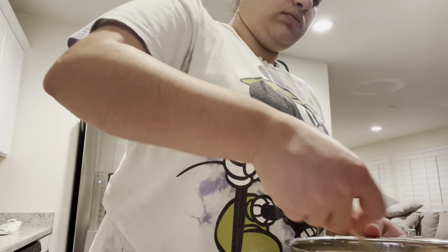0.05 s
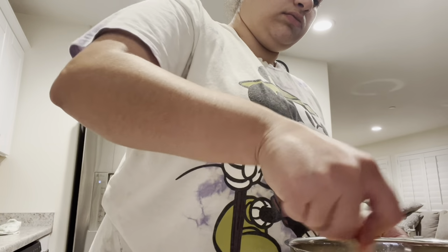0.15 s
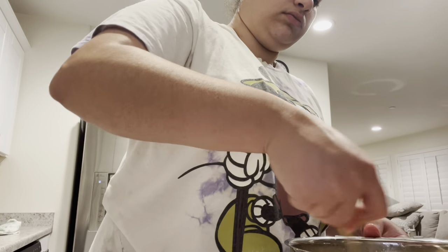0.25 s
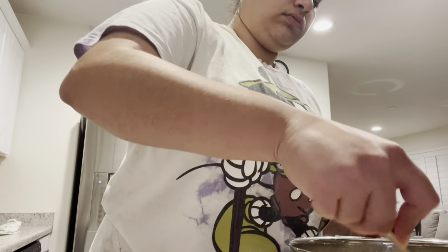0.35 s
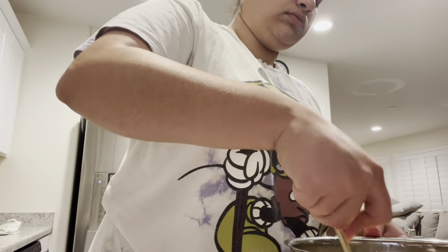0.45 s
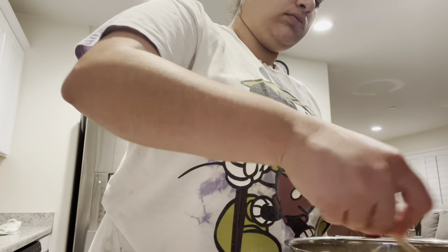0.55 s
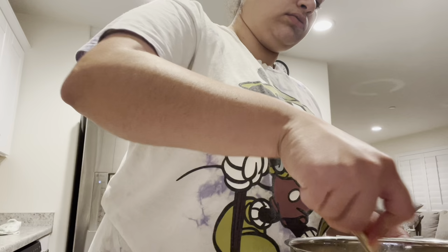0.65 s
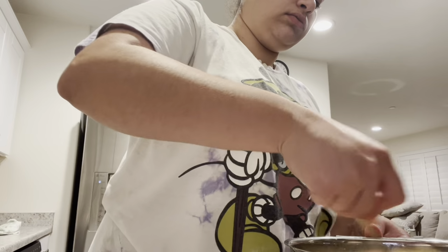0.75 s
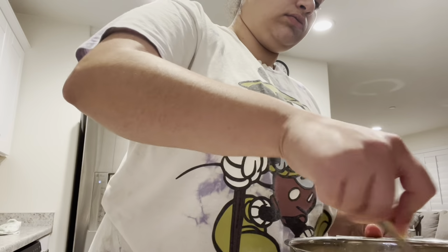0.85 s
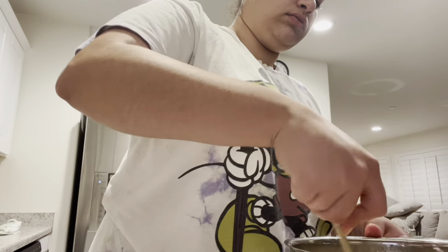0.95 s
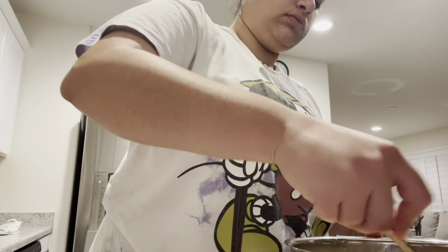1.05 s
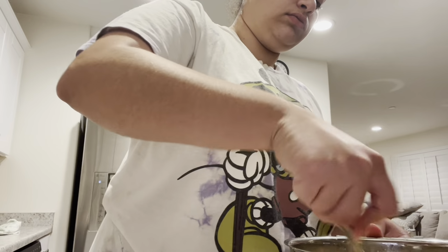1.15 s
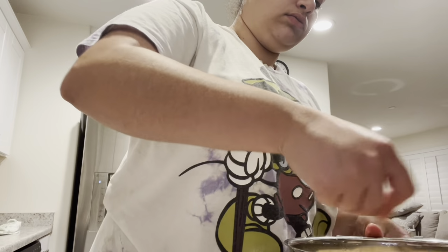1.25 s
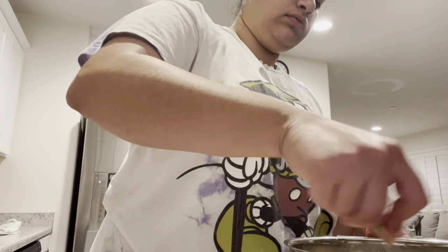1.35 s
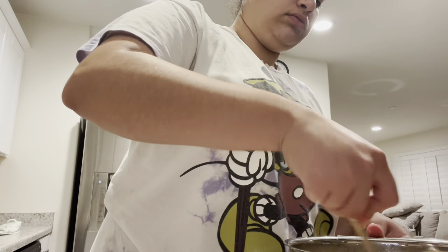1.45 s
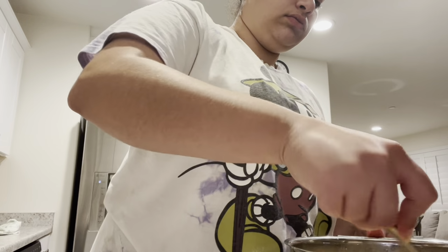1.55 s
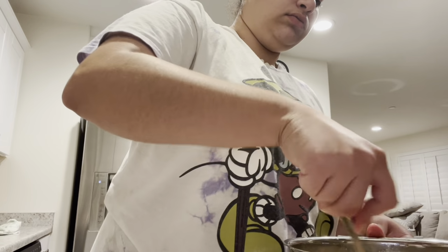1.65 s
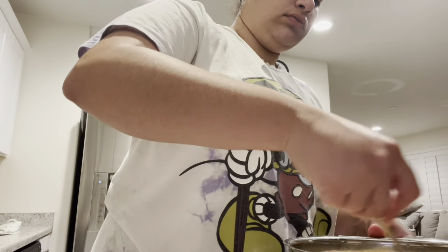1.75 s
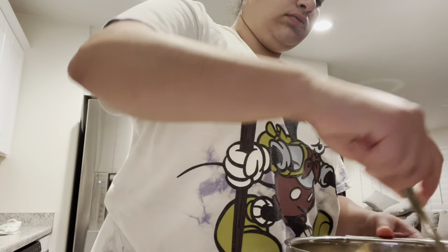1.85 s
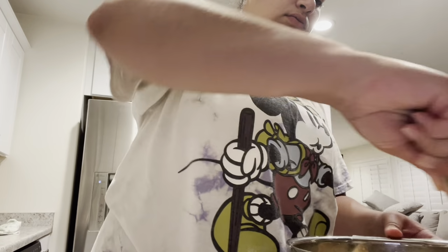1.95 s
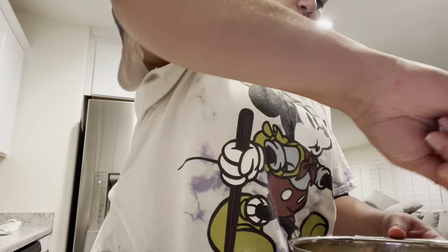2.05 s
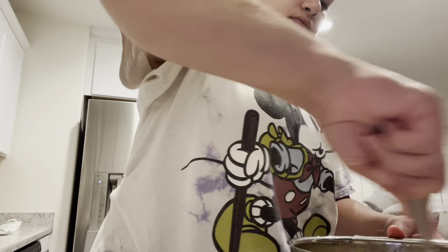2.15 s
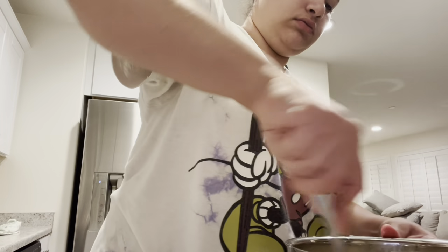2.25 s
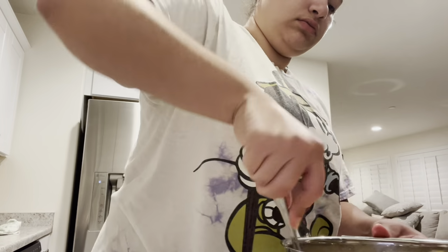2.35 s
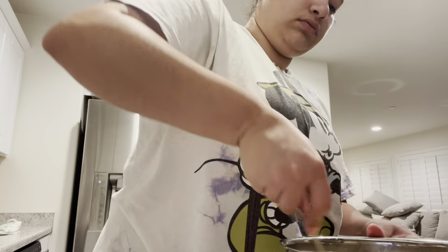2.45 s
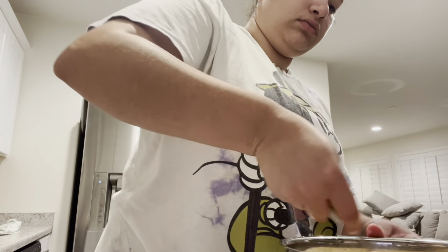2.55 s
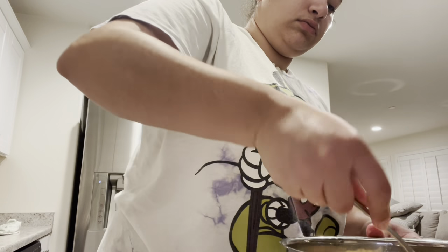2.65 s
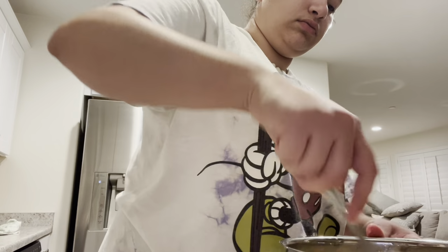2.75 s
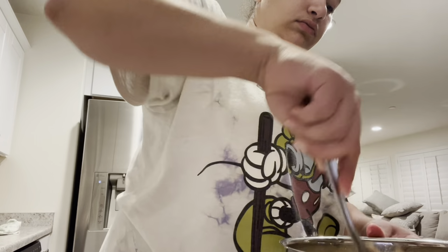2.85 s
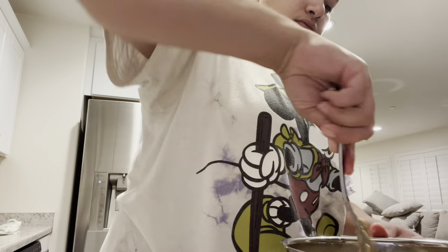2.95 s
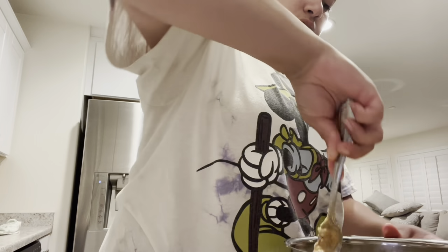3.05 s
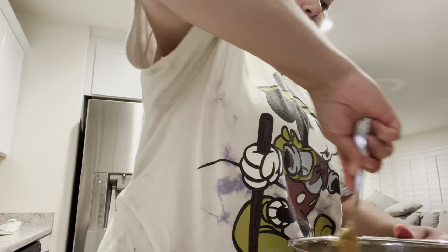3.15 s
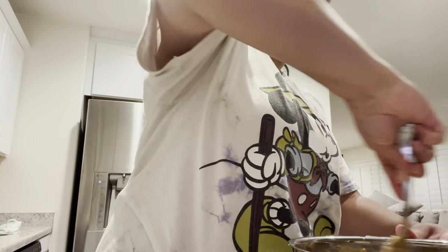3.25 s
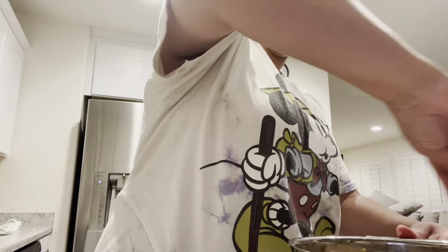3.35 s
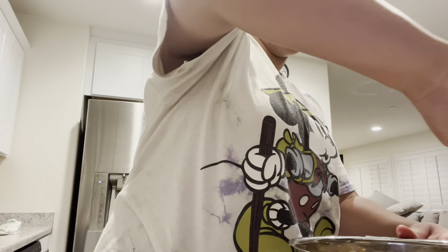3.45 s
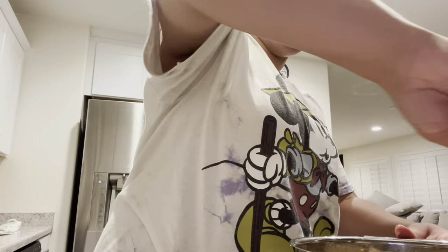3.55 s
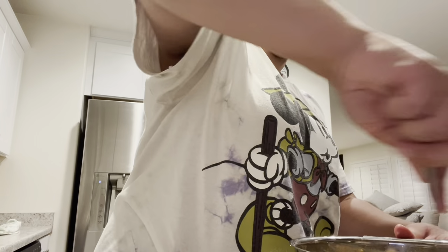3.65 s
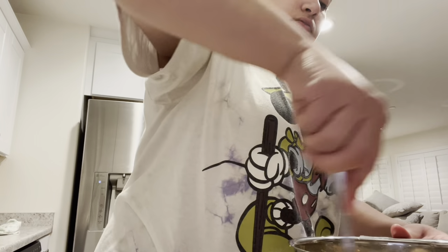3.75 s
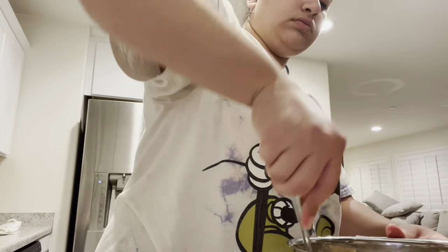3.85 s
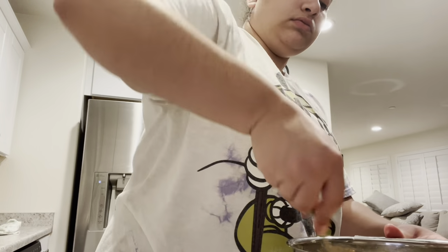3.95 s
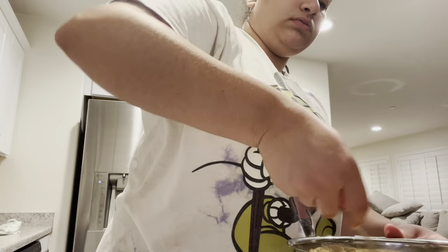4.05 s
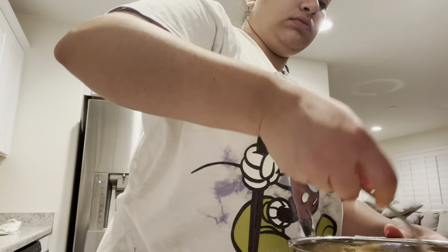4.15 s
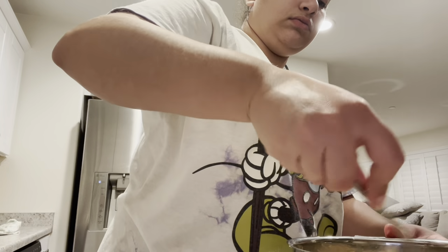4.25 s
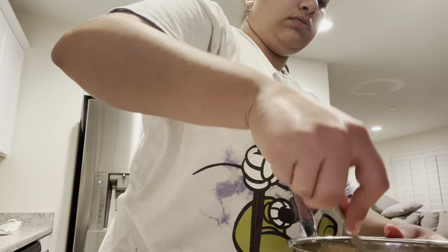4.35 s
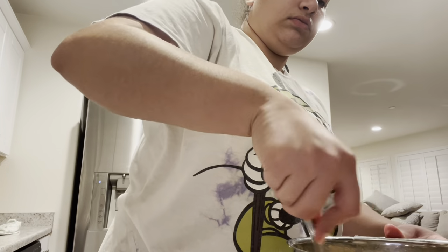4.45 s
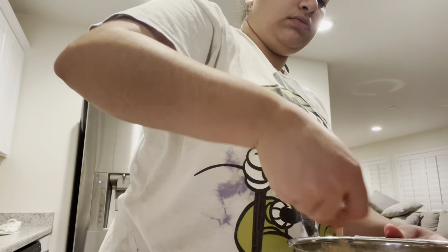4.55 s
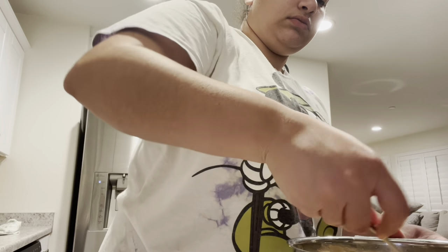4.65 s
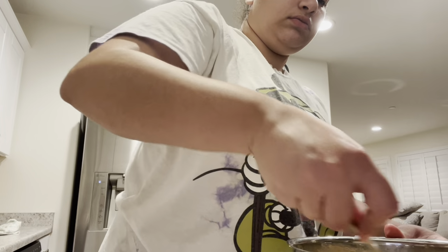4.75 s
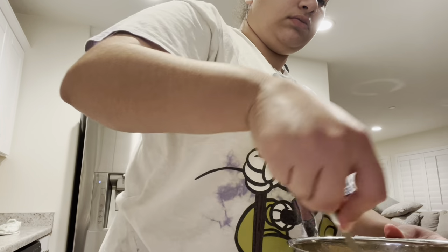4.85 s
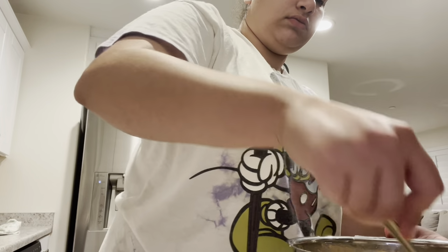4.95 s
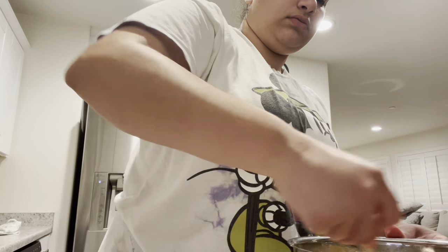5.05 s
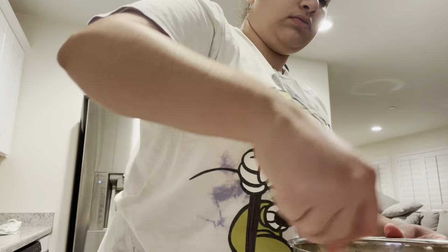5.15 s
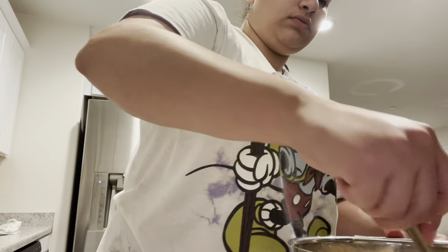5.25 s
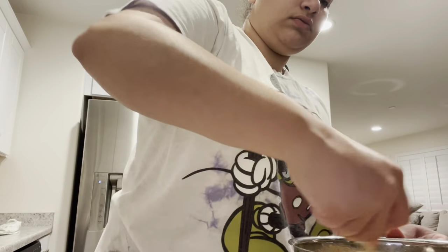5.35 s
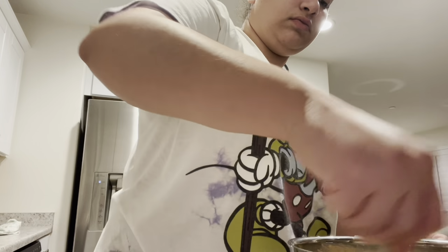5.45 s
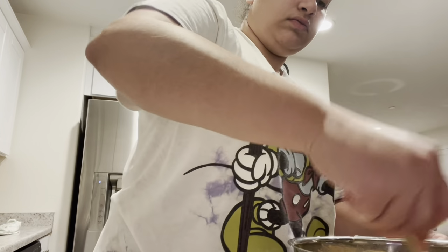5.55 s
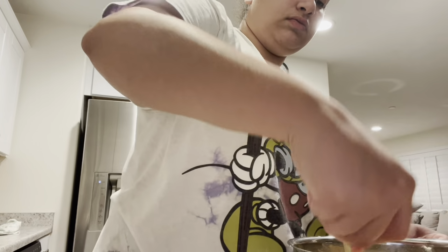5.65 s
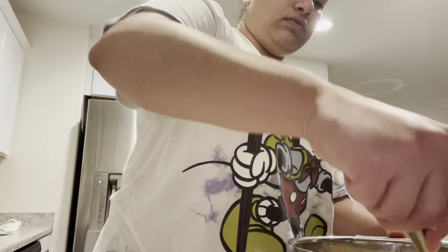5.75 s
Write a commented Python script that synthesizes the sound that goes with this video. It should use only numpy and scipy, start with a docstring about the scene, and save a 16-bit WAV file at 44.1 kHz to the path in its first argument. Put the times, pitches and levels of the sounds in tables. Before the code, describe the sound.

In a quiet home kitchen, a metal utensil pushes thick batter around a steel bowl, about four heavy low thumps a second with light clicks and wet squelches between. After nearly two seconds it pauses for gritty scrapes and a few bright clinks on the rim, then vigorous stirring returns. Close stereo microphone, short room reflections, faint low room tone.

```python
"""A metal utensil works thick batter in a steel bowl held on a kitchen counter, close to the microphone.
From the start, over a faint room tone, sliding makes noise from dense fine slips; taps and pushes click
on the wall (short noise and fading tones), rock the bowl (low decaying modes) and squelch (wet crackle).
Midway the stirring pauses for soft scraping, a few taps and brighter clinks (ringing metal modes).
Then the pushing resumes. Random reflections add the room around it all."""
import sys
import numpy as np
from scipy import signal
from scipy.fft import rfft, irfft, next_fast_len
from scipy.io import wavfile

SR = 44100
rng = np.random.default_rng(int(sys.argv[2]) if len(sys.argv) > 2 else 0)


def dump(signal):
    """Clip the signal to [-1, 1] and save it as 16-bit WAV at the path in sys.argv[1]."""
    limited = np.clip(np.atleast_2d(signal).T, -1, 1)
    pcm = np.round(limited * 32767).astype(np.int16)
    wavfile.write(sys.argv[1], SR, pcm)


N = 255339
TIME = np.arange(N) / SR
FREQS = np.maximum(np.fft.rfftfreq(N, 1 / SR), 1)

# Event levels are starting points: the functions below add their own gains. Colours give only balance.
# the quiet kitchen: (frequency [Hz], relative level per Hz [dB])
ROOM_TONE = [(25, -10), (60, 3), (130, 5), (240, -8.5), (340, -5.5), (450, -10), (600, -27), (820, -9.5),
             (1150, -27.5), (2000, -40.5), (5000, -47.5), (8700, -51.5), (11000, -61.5), (16000, -76.5)]
ROOM_TONE_DB = -55   # before the microphone
# the edge slides along the wall: (start [s], length [s], swell [s], rasp level [dB], hiss level [dB])
SLIDES = [(0, 1.96, 0.11, -63.5, -75.5), (2.035, 0.27, 0.037, -53.5, -57),
          (2.32, 0.15, 0.012, -50.5, -54.5), (2.926, 0.45, 0.11, -64, -75), (3.341, 0.27, .018, -51.5, -56),
          (3.679, .32, 0.021, -54, -59.5), (4.248, 0.0233, 0.02, -66, -73),
          (4.468, 0.084, 0.025, -54.5, -52), (4.959, 0.041, 0.017, -61, -54),
          (5.092, .64, 0.24, -60.5, -65.5)]
SLIDE_T60_S = 0.22   # time to fall by 60 dB after a slide
RESTING_DB = -83   # the utensil barely creeping between slides
# colour of the low, rough part of sliding: (frequency [Hz], relative level per Hz [dB])
RASP_COLOUR = [(150, 4), (420, 3.5), (620, -5.5), (1200, 3), (2000, -7), (3200, -5), (4300, -29),
               (6000, -18.5)]
# colour of the high part of sliding: (frequency [Hz], relative level per Hz [dB])
HISS_COLOUR = [(2000, -25), (3200, -35), (4700, -6), (6000, 2.5), (7500, 3.5), (9500, 6), (10700, -3),
               (14000, -4), (16500, -49.5)]
# ringing of the metal: (frequency [Hz], relative level [dB], time to fall 60 dB [s])
METAL_MODES = [(1173, -13, 0.14), (1234, 0, 0.058), (1504, -32, 0.055), (1687, -7, 0.061), (1853, -19, .05),
               (2062, 1, .07), (2265, -8.5, 0.058), (2582, -8, 0.11), (2920, -1.5, 0.035),
               (3290, -2, 0.018), (3545, -14.5, 0.14), (3580, -9, 0.065), (3870, -10, 0.11),
               (4128, -4.5, 0.066), (4460, -9.5, 0.22), (4890, -9, 0.082), (5330, -11.5, .06),
               (6180, -7.5, 0.048)]
# between pushes the edge taps the coated wall:
# (time [s], tick level [dB], thump level [dB], clack pitch [Hz])
TAPS = [(0.002, -44.5, -34.5, 790), (0.1585, -31.5, -30.5, 1334), (0.3586, -39.5, -37.5, 1030),
        (0.393, -29.5, -29.5, 2060), (0.5668, -35, -29.5, 1044), (0.6343, -33.5, -27.5, 1990),
        (0.731, -35.5, -40, 840), (0.84, -40.5, -39.5, 1160), (0.902, -36, -33, 1020),
        (1.0673, -34, -31, 1000), (1.116, -31.5, -28, 1950), (1.2792, -34.5, -29.5, 960),
        (1.37, -33, -30.5, 1330), (1.529, -46, -31.5, 840), (1.6042, -35.5, -30, 1235),
        (2.0378, -43.5, -42.5, 2120), (2.326, -48, -38.5, 3030), (3.855, -53, -37, 1670),
        (4.4738, -46, -40.5, 1260), (4.9527, -39, -34.5, 5140), (5.2172, -36, -32, 2040),
        (5.247, -37.5, -29, 1370), (5.4712, -30.5, -27, 2110), (5.5006, -31, -31.5, 1250),
        (5.73, -38.5, -36.5, 1690), (5.7534, -31.5, -34, 1440)]
TAP_CLACK_DB = -6.5   # relative to the tick
TAP_KNOCK_DB, TAP_SQUELCH_DB = -19.5, -17.5   # relative to the thump
TAP_POCKET_HZ = 1217   # air pocket pitch, also used for rim hits
# the loaded bowl rocking on the counter: (frequency [Hz], relative level [dB], time to fall 60 dB [s])
THUMP_MODES = [(68.9, -7, 0.64), (109.1, -0.5, 0.27), (152.35, 2, .17), (174, -13, 0.19), (221.1, -5, .15),
               (238.9, -3.5, .13)]
# the damped bowl wall: (frequency [Hz], relative level [dB], time to fall 60 dB [s])
KNOCK_MODES = [(281, -2.5, 0.03), (328, -15.5, 0.046), (382, -2, 0.081), (423.1, 0, 0.16), (442, -6, 0.13),
               (503, -15, 0.072), (649, -19.5, 0.067), (670, -18, 0.069), (768, -13.5, 0.061),
               (814, -13.5, 0.12), (993, -5.5, 0.063)]
# pitch the held bowl favours under a light tap; harder blows raise it: (time [s], pitch [Hz])
ROCKING = [(0, 142), (1.35, 176), (2.2, 155), (3.5, 121), (5.0, 143), (5.79, 139)]
LIGHT_TAP_DB, ROCKING_OCTAVES_PER_DB = -29, .018
# colour of the click: (frequency [Hz], relative level per Hz [dB])
TICK_COLOUR = [(1200, 0.5), (2800, -25), (4500, 2.5), (6000, 1.5), (9000, 1), (11000, 10.5), (14000, 2),
               (16500, -36.5)]
# colour of the wet crackle: (frequency [Hz], relative level per Hz [dB])
SQUELCH_COLOUR = [(400, -9.5), (750, 14.5), (1300, -11.5), (2000, 3), (3100, -2), (4500, -1), (6000, -2),
                  (9000, 0.5), (11000, 1.5), (14000, -2), (16500, -28)]
# once per turn the utensil shoves the batter against the wall:
# (time [s], thump level [dB], clack pitch [Hz], air pocket pitch [Hz])
PUSHES = [(0.212, -24.5, 1120, 3400), (0.45, -22, 1230, 997), (0.7013, -18, 3290, 2600),
          (0.9446, -25, 1190, 3180), (1.182, -20, 1094, 2420), (1.4494, -17, 990, 1040),
          (1.679, -18.5, 752, 2670), (5.066, -17, 5420, 1300), (5.36, -13.5, 3630, 3900),
          (5.609, -21.5, 1185, 1240)]
# what a push gives: (level at usual strength [dB], gain per dB of extra thump [dB/dB])
USUAL_PUSH_DB = -18.5
PUSH_TICK, PUSH_CLACK, PUSH_KNOCK, PUSH_SQUELCH = (-31.5, 0.63), (-36.5, .95), (-37.5, 2.4), (-42.5, 0.92)
# brief faint touches and wet catches, played as short rings:
# (time [s], level [dB], most favoured pitch [Hz])
SHORT_RINGS = [(1.293, -37, 3250), (1.9062, -45, 4500), (4.184, -66, 2000), (4.575, -54, 2590),
               (4.6664, -61.5, 3000), (5.528, -44, 2830)]
# in the pause it strikes the bare rim:
# (time [s], clack level [dB], clack pitch [Hz], ring level [dB], ring pitch [Hz], thump level [dB])
RIM_HITS = [(2.2428, -28, 900, -28.5, 1490, -32.5), (3.2632, -38.5, 2140, -31, 2106, -39),
            (3.6434, -37.5, 1400, -24.5, 2580, -61), (3.719, -49.5, 1680, -34.5, 1700, -30.5)]
RIM_TICK_DB = -10   # relative to the ring
RIM_KNOCK_DB = -16   # relative to the weaker of clack and thump
RIM_SQUELCH_DB = -20.5   # relative to the thump
# left minus right: (frequency [Hz], level difference [dB])
BALANCE = [(100, 2), (250, 0), (450, -2), (1000, -3), (2000, -10.5), (4000, -5.5), (8000, 0), (16000, 0)]
# how far the left side leads: (frequency [Hz], phase [radians])
LEAD = [(40, 2.5), (100, .9), (160, 1.35), (230, 1.84), (420, 1.42), (1300, -0.5), (1800, 1.2), (3800, -4),
        (6500, 1.54), (8000, 1.4), (11500, -4), (15500, -2)]
# colour of the reverberation: (frequency [Hz], relative level per Hz [dB])
ROOM_COLOUR = [(60, -3.5), (150, 1), (400, 2), (1000, 0), (4000, -4), (10000, -3.5), (16000, -18.5)]
CUTOFF_HZ = 16300


def from_db(db):
    """Turn decibels into gain."""
    return 10 ** (np.asarray(db) / 20)


def rms_one(x):
    """Scale to an average power of one."""
    return x / np.sqrt(np.mean(x ** 2) + 1e-20)


def at_hz(points, hz):
    """Read a table between its points, on a log-frequency axis."""
    f, value = np.transpose(points)
    return np.interp(np.log(hz), np.log(f), value)


def fade(t, t60):
    """Exponential decay from t = 0, falling 60 dB in t60 seconds."""
    return np.exp(-np.log(1000) * np.clip(t / t60, 0, 10)) * (t >= 0)


def add(out, s, sound):
    """Mix a sound in at time s."""
    i = max(int(s * SR), 0)
    out[..., i:i + sound.shape[-1]] += sound[..., :max(N - i, 0)]


def colour(x, spectrum):
    """Filter to a spectrum without sounding ahead of time (minimum phase), then set power to one."""
    size = next_fast_len(N + SR // 10) // 2 * 2
    hz = np.maximum(np.fft.rfftfreq(size, 1 / SR), 1)
    cepstrum = irfft(np.log(from_db(at_hz(spectrum, hz))))
    # folding the cepstrum forward makes the filter act only after its input
    cepstrum[1:size // 2] *= 2
    cepstrum[size // 2 + 1:] = 0
    response = np.exp(rfft(cepstrum))
    return rms_one(irfft(rfft(x, size) * response)[..., :N])


def stereo_noise(alike):
    """White noise that the two sides partly share."""
    alike = np.clip(alike, 0, 1)
    shared = np.sqrt(alike) * rng.standard_normal(N)
    return shared + np.sqrt(1 - alike) * rng.standard_normal((2, N))


def grains(per_s, spread_db, smooth, alike=0.45):
    """Tiny pops of uneven size over a smooth hiss."""
    sizes = from_db(spread_db * np.minimum(rng.exponential(1, N), 4))
    pops = sizes * (rng.random(N) < per_s / SR)
    return rms_one(pops * stereo_noise(alike)) + smooth * stereo_noise(alike)


def drift(per_s):
    """Smooth random wandering with a spread of one."""
    slow = np.exp(-(FREQS / per_s) ** 2)
    return rms_one(irfft(rfft(rng.standard_normal(N)) * slow, N))


def wall_echo(x, gap_s, wander, per_s, strength):
    """The bowl wall mirrors the moving blade: the changing path sweeps a comb through the sound."""
    wandering = drift(per_s) + 0.456 * np.array([drift(per_s), drift(per_s)])
    lags = gap_s * np.exp(wander * wandering)
    echo = np.array([np.interp(TIME - lag, TIME, side) for side, lag in zip(x, lags)])
    return rms_one(x + strength * echo)


def band_noise(centre_hz, width, length):
    """Stereo noise around one pitch, with power one; width is in natural-log units to each side."""
    band = signal.butter(2, centre_hz * np.exp([-width, width]), "band", fs=SR, output="sos")
    settled = signal.sosfilt(band, rng.standard_normal((2, length + SR // 20)))[:, -length:]
    return rms_one(settled)


def contacts(*names):
    """The named properties (s, Hz, levels in dB) of all pushes, taps and rim hits."""
    events = [push(*row) for row in PUSHES]
    events += [tap(*row) for row in TAPS]
    events += [rim_hit(*row) for row in RIM_HITS]
    return [np.array([event[name] for event in events]) for name in names]


def bursts(levels_db, t60, rise_s):
    """A loudness curve that jumps at each contact and dies away."""
    out, t = np.zeros(N), TIME[:SR // 2]
    for s, db in zip(*contacts("s"), levels_db):
        add(out, s, from_db(db) * fade(t, t60) * (1 - np.exp(-t / rise_s)))
    return out


def quiet_kitchen():
    """Steady coloured noise, mostly different on the two sides, makes the room tone."""
    return from_db(ROOM_TONE_DB) * colour(stereo_noise(0.13), ROOM_TONE)


def sliding():
    """Gains of rasp and hiss: each slide swells, stays level and dies away."""
    power = np.full((2, N), from_db(RESTING_DB) ** 2)
    for start, length, swell_s, rasp_db, hiss_db in SLIDES:
        t = TIME[:int((length + SLIDE_T60_S) * SR)]
        shape = np.minimum(t / swell_s, 1) * fade(np.maximum(t - length, 0), SLIDE_T60_S)
        add(power, start, (from_db([[rasp_db], [hiss_db]]) * shape) ** 2)
    return np.sqrt(power)


def metal_ring(centre_hz, scatter_db=2.0):
    """A short ring of the metal's modes, with those near one pitch favoured."""
    hz, db, t60 = np.transpose(METAL_MODES)[:, :, None]
    db = db - 7 * np.abs(np.log2(hz / centre_hz)) + scatter_db * rng.standard_normal(hz.shape)
    t, phase = TIME[:SR // 4], rng.random((2, len(METAL_MODES), 1))
    swings = np.sin(2 * np.pi * (hz * t + phase))
    return (from_db(db) * fade(t, t60) * swings).sum(1)


def scraping(ring_db, grit_db, patchy_db, catch_db, stutter_db):
    """Dense fine slips under the sliding edge, which also keep the metal faintly ringing."""
    rasp_gain, hiss_gain = sliding()
    slips = grains(per_s=740, spread_db=4.0, smooth=1.0, alike=0.19)
    ringing = rms_one(signal.fftconvolve(slips, metal_ring(centre_hz=2740), axes=1)[:, :N])
    # as the edge travels, each resonance of the metal swells and fades by itself
    grit = rms_one(sum(band_noise(hz, width=.02, length=N) * from_db(patchy_db * drift(20))
                       for hz, db, t60 in METAL_MODES))
    # now and then a coarser grain catches under the edge
    catches = colour(grains(per_s=39, spread_db=-0.5, smooth=0, alike=0.45), SQUELCH_COLOUR)
    rasp = colour(slips, RASP_COLOUR) + from_db(ring_db) * ringing
    rasp = rms_one(rasp + from_db(grit_db) * grit + from_db(catch_db) * catches)
    hiss = colour(grains(per_s=1300, spread_db=1, smooth=2.3), HISS_COLOUR)
    hiss = wall_echo(hiss, gap_s=0.000803, wander=0.21, per_s=2.7, strength=0.62)
    grip = from_db(stutter_db * drift(17))  # the edge catches and lets go
    return grip * (rasp * rasp_gain + hiss * hiss_gain)


def tap(s, tick_db, thump_db, clack_hz):
    """The clack follows the sharpness of the tap; knock and squelch follow the weight behind it."""
    return dict(s=s, tick=tick_db, clack=tick_db + TAP_CLACK_DB, clack_hz=clack_hz, thump=thump_db,
                knock=thump_db + TAP_KNOCK_DB, squelch=thump_db + TAP_SQUELCH_DB, pocket_hz=TAP_POCKET_HZ)


def clicks(blow_db, snap_db, tick_gain_db, clack_gain_db, note_db, note_width, note_t60):
    """The edge snaps onto the wall and chatters briefly, with a dead note set by where it lands."""
    s, tick_db, clack_db, pitch_hz = contacts("s", "tick", "clack", "clack_hz")
    chatter = colour(grains(per_s=3500, spread_db=0.5, smooth=0.31, alike=0.95), TICK_COLOUR)
    chatter = wall_echo(chatter, gap_s=0.000509, wander=.4, per_s=4.18, strength=0.34)
    out = chatter * bursts(tick_db + tick_gain_db, t60=0.038, rise_s=0.00088)
    t = TIME[:SR // 8]
    bright = signal.butter(2, 7500, "high", fs=SR, output="sos")
    for at, tick, db, hz in zip(s, tick_db, clack_db, pitch_hz):
        snap = signal.sosfilt(bright, rng.standard_normal(len(t)) * fade(t, t60=0.0018))
        add(out, at + 0.0011, from_db(tick + snap_db) * snap)
        # the blow itself: a few solid cycles of the wall
        blow = np.sin(2 * np.pi * hz * t) * fade(t, t60=0.02) * (1 - np.exp(-t / 0.00076))
        add(out, at + 0.00102, from_db(db + blow_db) * blow)
        clack = band_noise(np.clip(hz, 1150, 2200), width=0.87, length=len(t)) * fade(t, t60=0.053)
        note = band_noise(hz, note_width, len(t)) * fade(t, note_t60)
        mix = from_db(clack_gain_db) * clack + from_db(note_db) * note
        add(out, at, from_db(db) * mix * (1 - np.exp(-t / 0.0016)))
    return out


def bowl_ring(modes, levels_db, centres_hz, travel_s, rise_s, punch, punch_t60,
              scatter_db, detune, focus_db):
    """Each contact pushes the bowl's modes; bending waves are slower at low pitch, so lows arrive late."""
    hz, mode_db, t60 = np.transpose(modes)[:, :, None]
    out = np.zeros(N)
    t = np.maximum(TIME[:SR // 3] - travel_s * (hz[0] / hz) ** .5, 0)
    # a first swing that the batter soon swallows, together with a longer ring
    decay = fade(t, t60) + punch * fade(t, punch_t60)
    shape = from_db(mode_db) * decay * (1 - np.exp(-(t / rise_s) ** 2))
    for s, db, centre_hz in zip(*contacts("s"), levels_db, centres_hz):
        strength, shift = rng.standard_normal((2, len(modes), 1))
        # the place of contact favours some modes; the moving batter detunes them
        weight = from_db(scatter_db * strength - focus_db * np.log2(hz / centre_hz) ** 2)
        swing = (shape * weight * np.sin(2 * np.pi * hz * (1 + detune * shift) * t)).sum(0)
        # the level is set over the first 40 ms
        add(out, s, from_db(db) * swing / np.std(swing[:SR // 25]))
    return out


def rocking_and_knocking():
    """The low thump of the rocking bowl and the higher knock of its wall; harder blows favour higher modes."""
    s, knock_db, thump_db = contacts("s", "knock", "thump")
    light_tap_hz = np.interp(s, *np.transpose(ROCKING))
    thump_hz = light_tap_hz * 2 ** (ROCKING_OCTAVES_PER_DB * (thump_db - LIGHT_TAP_DB))
    thump = bowl_ring(THUMP_MODES, thump_db - 3.5, thump_hz, travel_s=0.00796, rise_s=0.0034,
                      punch=0.86, punch_t60=0.089, scatter_db=4.0, detune=0.029, focus_db=14.5)
    knock = bowl_ring(KNOCK_MODES, knock_db, 2.03 * thump_hz, travel_s=0.00402, rise_s=0.0077,
                      punch=2.6, punch_t60=0.043, scatter_db=4.5, detune=0.015, focus_db=7.5)
    return thump + knock


def squelch(gain_db, pocket_db, pocket_width, t60):
    """Batter tears from the wall behind each stroke: a wet crackle, coloured by the opening air pocket."""
    s, squelch_db, pocket_hz = contacts("s", "squelch", "pocket_hz")
    crackle = colour(grains(per_s=600, spread_db=-1.5, smooth=0.92), SQUELCH_COLOUR)
    crackle = wall_echo(crackle, gap_s=0.000578, wander=0.386, per_s=8.3, strength=0.8)
    out = crackle * bursts(squelch_db + gain_db, t60, rise_s=0.013)
    t = TIME[:SR // 4]
    for at, db, hz in zip(s, squelch_db, pocket_hz):
        pocket = band_noise(hz, pocket_width, len(t)) * fade(t, t60) * (1 - np.exp(-t / 0.0035))
        add(out, at, from_db(db + pocket_db) * pocket)
    return out


def push(s, db, clack_hz, pocket_hz):
    """One strength drives the whole push; the wall's knock grows fastest with it."""
    tick, clack, knock, wet = (level + growth * (db - USUAL_PUSH_DB) for level, growth in
                               (PUSH_TICK, PUSH_CLACK, PUSH_KNOCK, PUSH_SQUELCH))
    return dict(s=s, tick=tick, clack=clack, clack_hz=clack_hz, thump=db,
                knock=knock, squelch=wet, pocket_hz=pocket_hz)


def short_rings(gain_db):
    """Brief faint touches, wet catches and rim hits, all played as short rings of the metal's modes."""
    rings = list(SHORT_RINGS)
    rings += [(s, ring_db, ring_hz) for s, _, _, ring_db, ring_hz, _ in RIM_HITS]
    out = np.zeros((2, N))
    for s, db, centre_hz in rings:
        add(out, s, from_db(db + gain_db) * metal_ring(centre_hz))
    return out


def rim_hit(s, clack_db, clack_hz, ring_db, ring_hz, thump_db):
    """A hit on the bare rim is mostly clack and ring; the wall knocks only if it is both hard and heavy."""
    return dict(s=s, tick=ring_db + RIM_TICK_DB, clack=clack_db, clack_hz=clack_hz, thump=thump_db,
                knock=min(clack_db, thump_db) + RIM_KNOCK_DB, squelch=thump_db + RIM_SQUELCH_DB,
                pocket_hz=TAP_POCKET_HZ)


def left_and_right(dry):
    """The two sides differ in level and phase by pitch, which places the sound between left and right."""
    left_right = np.array([[.5], [-.5]])
    gains = from_db(at_hz(BALANCE, FREQS) * left_right)
    sides = gains * np.exp(1j * at_hz(LEAD, FREQS) * left_right)
    even_power = np.sqrt(np.mean(np.abs(sides) ** 2, 0))
    return irfft(rfft(dry) * sides / even_power, N)


def kitchen(x, wet_db, t60, gap_s):
    """Diffuse reflections from the walls and cupboards: a fading random tail follows each sound."""
    t = TIME[:SR]
    tail = rng.standard_normal((2, SR)) * fade(t, t60) * (1 - np.exp(-(t / gap_s) ** 2))
    tail = tail / np.sqrt(np.sum(tail ** 2) / 2)
    wet = signal.fftconvolve(x, tail, axes=1)[:, :N]
    return from_db(wet_db) * np.std(wet) * colour(wet, ROOM_COLOUR)


def scene():
    """Utensil, bowl and batter spread between left and right, with reflections, in a quiet room."""
    room_tone = quiet_kitchen()
    scrape = scraping(ring_db=-5.5, grit_db=-2.5, patchy_db=5.0, catch_db=-9.5, stutter_db=3.5)
    click = clicks(blow_db=8.5, snap_db=9, tick_gain_db=5.5, clack_gain_db=2.0,
                   note_db=2.5, note_width=0.085, note_t60=0.047)
    bowl = rocking_and_knocking()
    batter = squelch(gain_db=9.5, pocket_db=1.5, pocket_width=0.095, t60=0.15)
    rings = short_rings(gain_db=-2.0)
    dry = left_and_right(scrape + click + bowl + batter + rings)
    return dry + kitchen(dry, wet_db=-12.0, t60=0.43, gap_s=0.012) + room_tone


def record(dry):
    """The microphone port has a deep notch in the treble (one filter used twice); the top is cut."""
    notch = signal.iirnotch(11800, 4.5, fs=SR)
    notched = signal.lfilter(*notch, signal.lfilter(*notch, dry))
    top_cut = signal.ellip(10, .2, 80, CUTOFF_HZ, fs=SR, output="sos")
    return signal.sosfilt(top_cut, notched)


dry = scene()
out = record(dry)
dump(out)
```